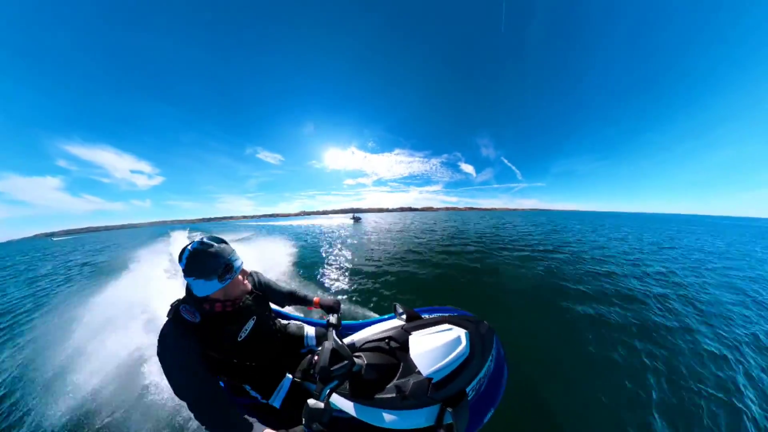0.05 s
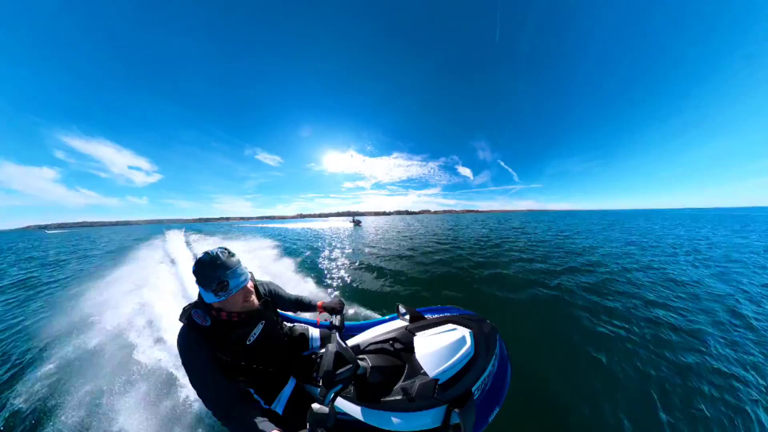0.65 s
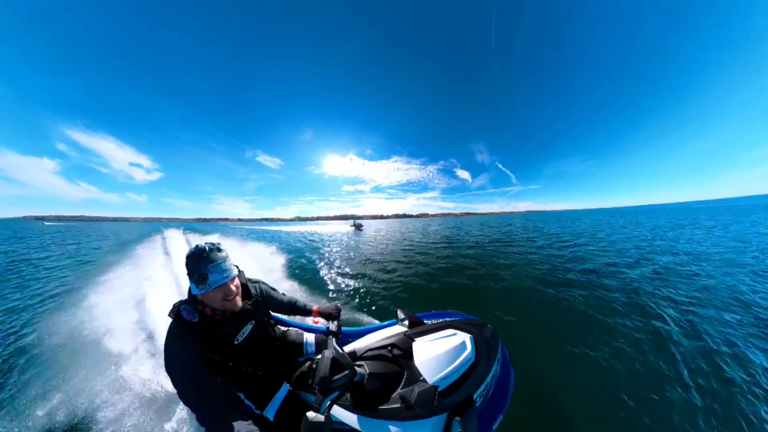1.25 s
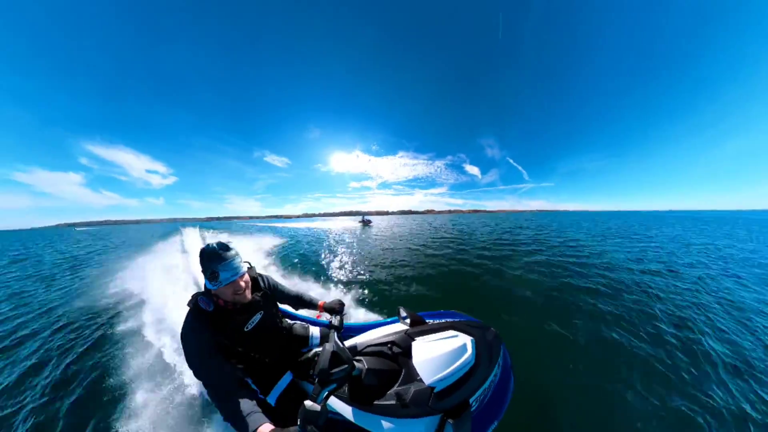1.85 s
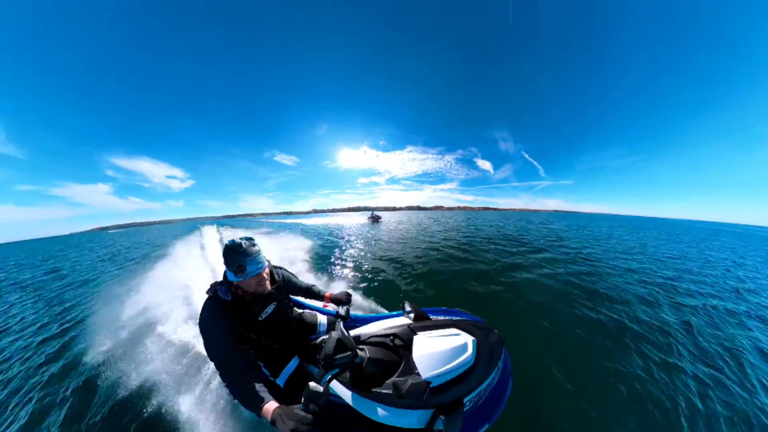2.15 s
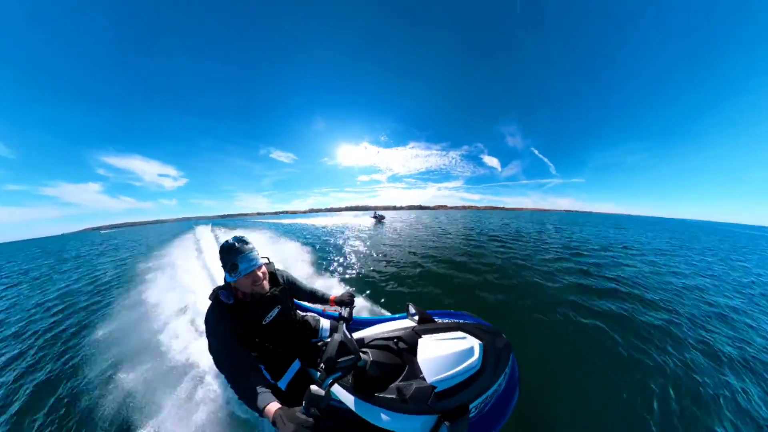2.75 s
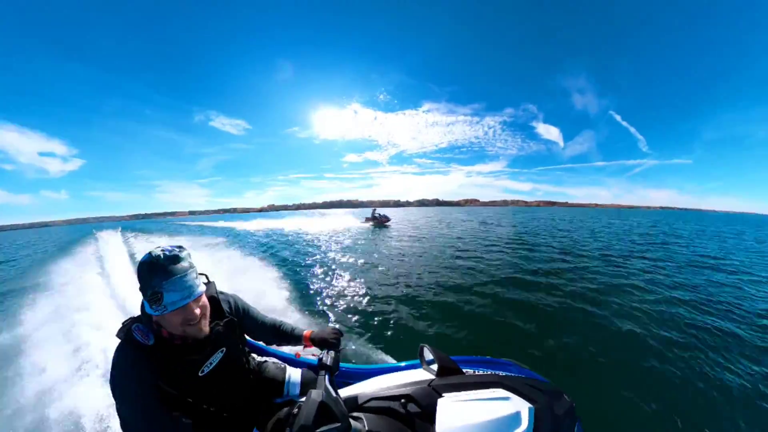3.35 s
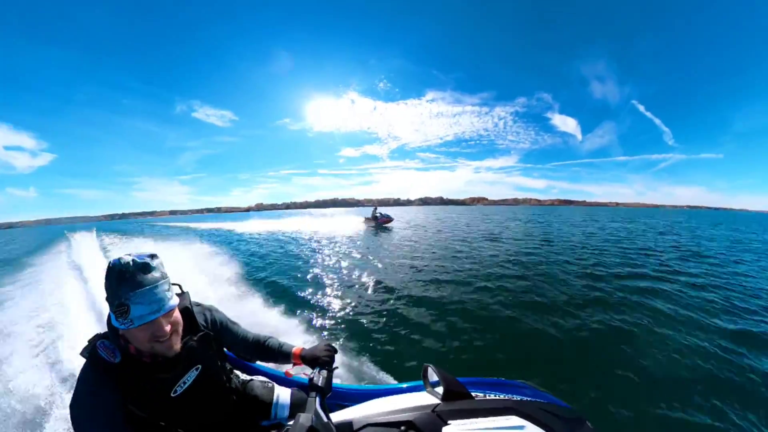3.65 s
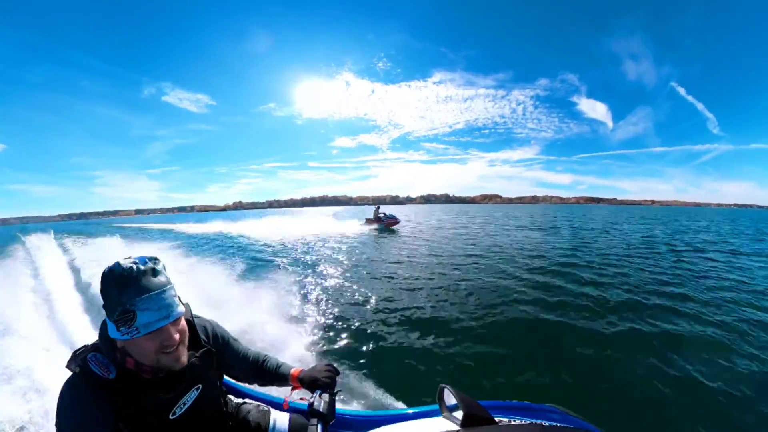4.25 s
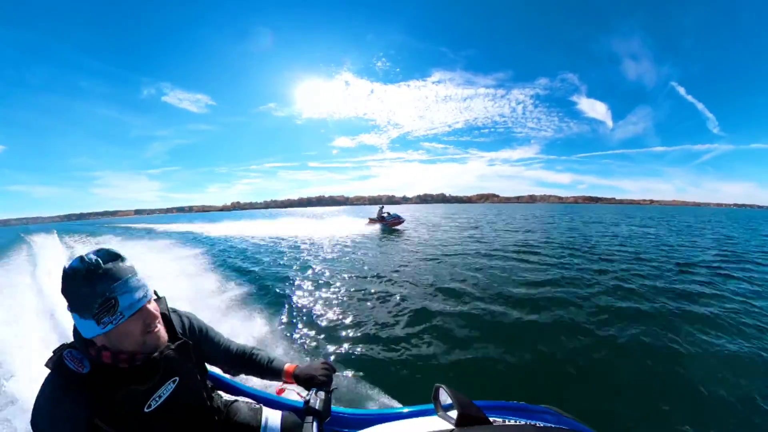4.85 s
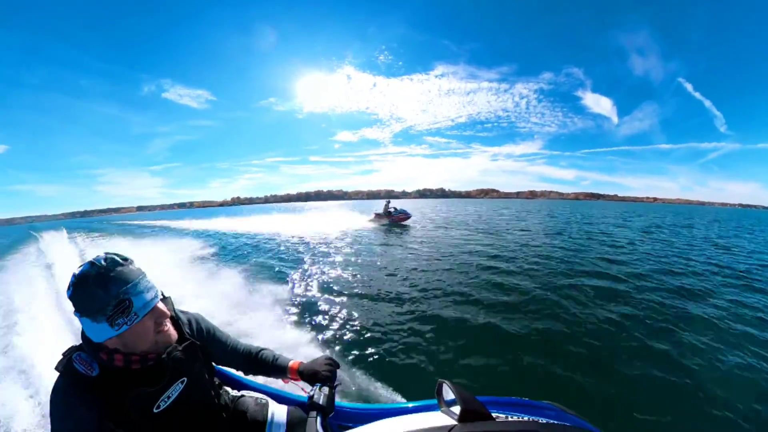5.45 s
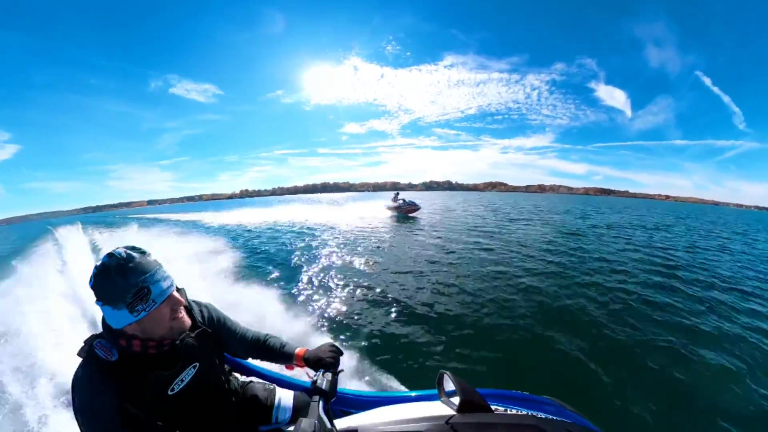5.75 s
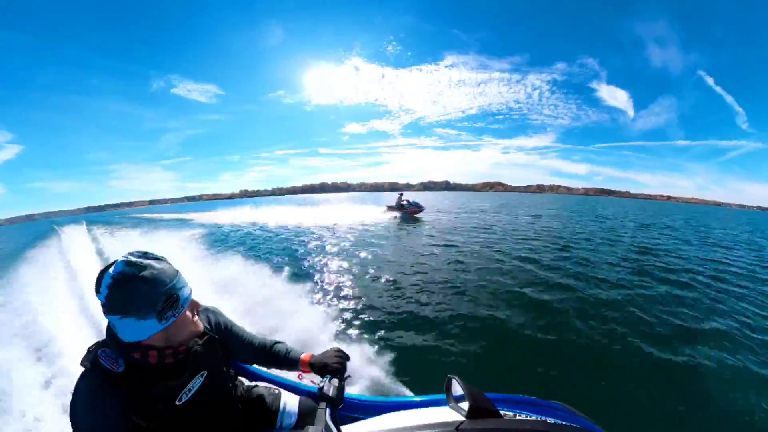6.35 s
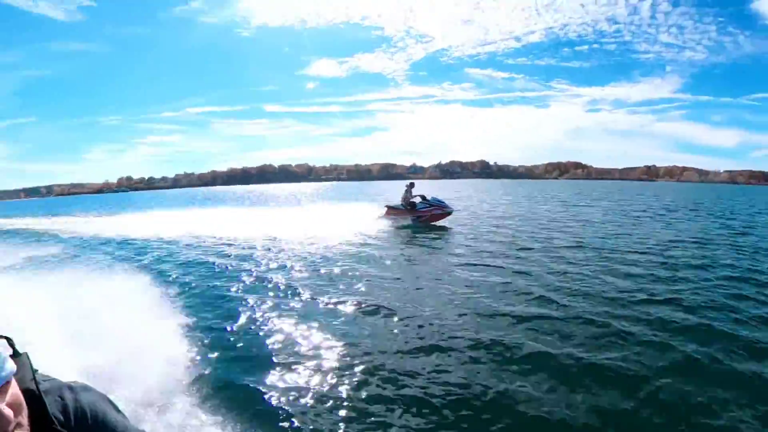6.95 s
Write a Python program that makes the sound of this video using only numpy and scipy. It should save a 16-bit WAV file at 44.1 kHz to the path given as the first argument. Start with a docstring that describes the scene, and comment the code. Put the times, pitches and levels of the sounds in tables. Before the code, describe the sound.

Low wind buffets the microphone as a personal watercraft speeds along, its engine humming evenly and water rushing along the hull.

```python
"""A personal watercraft runs at full, steady throttle over open water, heard from its rider's camera.
From the start, the four-stroke engine drones through low, thumping wind. Each wave swells the rush
of water along the hull and the thin hiss of spray. Now and then water slaps the hull or a drop ticks
on the camera. At about 5.7 s the hull lands flat with one dull knock. The strongest wind thump follows
at 6 s, then one more big wave near 6.9 s, while the engine drones on to the end."""
import sys
import numpy as np
from scipy import signal
from scipy.fft import rfft, irfft
from scipy.io import wavfile
from scipy.ndimage import uniform_filter1d

SR = 44100
rng = np.random.default_rng(int(sys.argv[2]) if len(sys.argv) > 2 else 0)


def output_pcm(signal):
    """Save a mono or channel-first signal as 16-bit PCM at the path in sys.argv[1].

    Samples are clipped to [-1, 1] before scaling.
    """
    pcm = np.clip(np.atleast_2d(signal).T, -1, 1) * 32767
    wavfile.write(sys.argv[1], SR, np.round(pcm).astype(np.int16))


N = 317961
TIME = np.arange(N) / SR
TOP_HZ = 9100  # the camera hears little above this pitch

# The larger waves that the bow meets. Columns: peak_s, swell_db
BOW_WAVES = [(0.26, 3.5), (0.52, 2.5), (0.96, 3.5), (1.25, 2.5), (1.44, 0.5), (1.66, 3), (2.06, 2.5),
             (2.5, 2.5), (2.75, 2.5), (3.15, 2), (3.72, 0.5), (4.61, 1.6), (5.05, 1), (5.23, 1),
             (5.77, -0.5), (5.9, 3.5), (6.22, 1.5), (6.55, 1.5), (6.89, 4)]
# How strong each pitch is in the hiss of spray. Columns: pitch_hz, relative_db
SPRAY_SPECTRUM = [(1000, -21.5), (3200, -1), (4000, -11.5), (4800, -21.5), (5500, -15), (6300, -4.5),
                  (7100, -1.5), (8000, -6.5), (8600, -15.5), (9200, -29.5)]
# The tick of the camera's shell when a drop hits it. Columns: pitch_hz, relative_db
TICK_SPECTRUM = [(1000, -26), (3000, -8), (4500, -20.5), (5500, -15.5), (6400, -2), (7400, 3), (8200, -6.5),
                 (9200, -20.5)]
# Drops on the camera. Columns: start_s, relative_peak_db, splash_share, brightness_db_per_octave
CAMERA_DROPS = [(0.1435, -48.5, .06, 3), (0.2688, -44, .06, 3), (1.668, -48, .18, -5), (1.676, -51, .08, 1),
                (1.9838, -54, .1, -10), (3.1256, -54, .1, -11), (3.1666, -38.5, .045, 3),
                (3.5221, -50, .06, 2), (3.7185, -46, .06, 0), (3.9275, -55, .05, -12),
                (4.2204, -43, .04, -4), (4.4679, -45.5, .06, 7), (5.1053, -44, .06, 2),
                (5.2765, -53, .15, -6.5), (5.642, -53, .4, -5), (5.7346, -52, .4, -2),
                (5.7419, -51, .1, -3), (5.779, -54, .3, -5), (5.7839, -50, .15, 2), (5.888, -48, .15, 2),
                (5.8963, -53, .2, -7.5), (6.5255, -46, .06, -2), (6.852, -51, .3, 0),
                (6.9103, -51, .25, -3), (6.9642, -44, .1, 3), (7.1496, -39.5, .04, 1)]
# Slaps of water on the hull. Columns: start_s, peak_db, pitch_hz, decay_s
HULL_SLAPS = [(0.144, -42, 2300, .004), (1.274, -42, 2000, .003), (1.417, -40, 2000, 0.0018),
              (1.667, -37.5, 1680, .005), (1.984, -37, 2170, 0.0012), (2.415, -41, 2210, 0.0038),
              (4.288, -37, 1600, 0.0023), (4.904, -35.5, 1730, 0.0023), (5.733, -35, 1300, 0.0058),
              (5.896, -39, 2100, 0.0027), (6.91, -40, 2020, 0.0044), (6.963, -42, 2500, .002),
              (7.15, -45.5, 2500, .001)]
# Water rushing along the hull. Columns: pitch_hz, relative_db
RUSH_SPECTRUM = [(200, -11.5), (420, 0.5), (520, 1), (590, -3.5), (700, -4.5), (820, -6.5), (920, -10),
                 (1040, -10), (1130, -14), (1260, -13), (1500, -20), (2000, -26), (2900, -34.5),
                 (6000, -84.5)]
# Wind beating on the microphone. Columns: pitch_hz, relative_db
WIND_SPECTRUM = [(8, -43.5), (20, -24), (30, -15), (40, -8), (58, -6), (82, 1.5), (102, -5), (135, -4),
                 (160, -8), (220, -6), (290, -11), (370, -11.5), (440, -25), (900, -50.5)]
# Gusts and lulls in the headwind. Columns: peak_s, rumble_change_db, flutter_change_db
WIND_GUSTS = [(0.09, -4, 1), (0.56, -6.5, 5.5), (0.86, -6, 0), (0.97, -2, 3), (1.62, -1, -1.5),
              (1.69, 0.5, 4), (2.17, 0.5, 2.5), (2.27, -0.5, -2), (2.62, -4.5, 3), (2.76, -0.5, 3),
              (3.17, 0.5, 1.5), (3.3, 0, 3.6), (3.41, -2, -4.5), (3.75, 1.5, 2), (5.25, -1.5, 1),
              (5.36, -5, -1), (6.15, -6, 0.5), (6.71, 0, 0), (6.96, -1, 1)]
# Large swirls of air that thump on the microphone. Columns: peak_s, peak_db, pitch_hz
WIND_THUMPS = [(0.424, -16.5, 76.7), (0.63, -19.5, 86), (0.783, -21.5, 82), (1.047, -19.5, 79),
               (1.884, -17.5, 80), (2.332, -21, 83.5), (2.895, -18, 88), (3.34, -23, 79.5), (3.62, -24, 70),
               (3.997, -18, 74), (4.298, -21, 85), (5.025, -25, 89), (5.121, -23, 78), (5.29, -19, 85),
               (5.999, -14.5, 68.6), (6.267, -17.5, 93), (6.31, -20.5, 74.4), (6.585, -21, 73.4),
               (6.775, -20, 82)]
# Engine speed, which sags a little when the pump bites harder. Columns: time_s, cycles_per_s
ENGINE_SPEED = [(0, 60.02), (0.55, 60.33), (0.9, 60.0), (1.3, 59.68), (2.1, 60.14), (3.0, 59.97),
                (3.85, 60.1), (4.3, 59.55), (4.7, 59.87), (5.6, 60.08), (7.21, 60.04)]
# The tones that make up the engine's drone. Columns: multiple_of_cycle_rate, base_level_db
ENGINE_TONES = [(2, -43), (4, -32), (6, -39), (7, -51), (8, -43.5), (10, -53), (11, -51.5), (14, -59.5),
                (16, -53.5), (17, -54.5), (18, -62.5), (19, -65), (20, -60.5), (21, -59.5), (22, -72),
                (28, -75.5), (39, -73.5), (41, -77), (48, -79)]
# The rise and fall of the exhaust note. Columns: time_s, relative_db
EXHAUST_SWELLS = [(0, -23.5), (0.11, -27), (0.24, -37), (0.47, -41), (0.61, -31.5), (1.22, -26),
                  (1.38, -33), (1.68, -33.5), (1.9, -37.5), (2.25, -35.5), (2.78, -29), (3.4, -34.5),
                  (3.85, -32.5), (4.35, -27), (4.72, -27), (5.03, -37.5), (5.23, -30.5), (5.95, -34),
                  (6.15, -31.5), (6.52, -30.5), (6.72, -40), (7.0, -30.5), (7.21, -29)]


def amp(db):
    """Turns decibels into a number to multiply a sound by."""
    return 10 ** (np.asarray(db) / 20)


def unit(x):
    """Scales x so that its average strength (rms) is 1."""
    return x / np.sqrt(np.mean(x ** 2) + 1e-20)


def curve(rows):
    """Joins (time_s, value) points with straight lines."""
    return np.interp(TIME, *np.transpose(rows))


def colour(x, spectrum):
    """Makes each pitch in x as strong as the spectrum says, and silences those beyond its ends."""
    hz, db = np.transpose(spectrum)
    all_hz = np.fft.rfftfreq(len(x), 1 / SR)
    shape_db = np.interp(np.log(all_hz + 1), np.log(hz), db, left=-120, right=-120)
    return irfft(rfft(x) * amp(shape_db), len(x))


def drift(rate_hz, points=8192):
    """A smooth random wobble of strength 1 that changes up to about rate_hz times a second."""
    hz = np.fft.rfftfreq(points, TIME[-1] / points)
    slow = irfft(rfft(rng.standard_normal(points)) / np.sqrt(1 + (hz / rate_hz) ** 4))
    return unit(np.interp(TIME, np.linspace(0, TIME[-1], points), slow))


def humps(rows, rise_s, fall_s):
    """A level in dB with one smooth hump or dip for each (peak_s, change_db) row."""
    return sum(db * np.exp(-.5 * ((TIME - peak_s) / np.where(TIME < peak_s, rise_s, fall_s)) ** 2)
               for peak_s, db in rows)


def add(mix, start_s, sound):
    """Mixes a sound in at start_s."""
    part = mix[round(start_s * SR):][:len(sound)]
    part += sound[:len(part)]


def wave_swell(chop_db=0.5, chop_hz=6.2):
    """How hard the hull works the water, in dB: the larger waves on top of a small random chop."""
    return humps(BOW_WAVES, rise_s=0.069, fall_s=0.056) + chop_db * drift(chop_hz)


def spray(swell_db, level_db=-67.0, follow=0.9, droplets_per_s=260, droplet_db=-7.0, spread_db=4.0):
    """Each wave throws up a fine, hissing mist with droplets of uneven size in it."""
    sizes = amp(spread_db * np.minimum(rng.exponential(1, N), 4)) * rng.choice([-1, 1], N)
    droplets = unit(sizes * (rng.random(N) < droplets_per_s / SR))
    mist = rng.standard_normal(N) * amp(1.15 * drift(rate_hz=40))
    hiss = unit(colour(mist + amp(droplet_db) * droplets, SPRAY_SPECTRUM))
    return hiss * amp(level_db + follow * swell_db)


def camera_drops(boost_db=1, splash_s=0.0028):
    """Each drop makes a sharp tick, then a tiny splash; some ticks sound bright, others dull."""
    out, t = np.zeros(N), np.arange(2048) / SR
    for start_s, peak_db, splash_share, brightness in CAMERA_DROPS:
        splash = splash_share * rng.standard_normal(len(t)) * np.exp(-t / splash_s)
        hit = np.roll((t == 0) + splash, len(t) // 2)  # centred, to give the filter room on both sides
        spectrum = [(hz, db + brightness * np.log2(hz / TOP_HZ)) for hz, db in TICK_SPECTRUM]
        tick = colour(hit, spectrum)
        add(out, start_s - t[-1] / 2, amp(peak_db + boost_db) * tick / abs(tick).max())
    return out


def hull_slaps(rise_s=0.0012, treble_limit_hz=3350):
    """Lumps of water strike the hull, each making a short, dull burst of noise."""
    out, t = np.zeros(N), np.arange(2048) / SR
    dull = signal.butter(4, treble_limit_hz, fs=SR, output="sos")
    for start_s, peak_db, pitch_hz, decay_s in HULL_SLAPS:
        band = signal.butter(3, [0.49 * pitch_hz, 1.19 * pitch_hz], "band", fs=SR, output="sos")
        burst = rng.standard_normal(len(t)) * np.minimum(t / rise_s, 1) * np.exp(-t / decay_s)
        slap = signal.sosfilt(np.vstack([band, dull]), burst)
        add(out, start_s - rise_s, amp(peak_db) * slap / abs(slap).max())
    return out


def hull_knock(peak_s=5.7421, peak_db=-18.5, pitch_hz=620):
    """The hull lands flat on a wave and sends out one dull pulse that does not ring."""
    offset_squared = (np.pi * pitch_hz * (TIME - peak_s)) ** 2
    return amp(peak_db) * (2 * offset_squared - 1) * np.exp(-offset_squared)


def hull_rush(swell_db, level_db=-36.0, follow=0.9, churn_db=0.8):
    """Water churns along the hull and gets louder each time the bow meets a wave."""
    churn = rng.standard_normal(N) * amp(churn_db * drift(rate_hz=51))
    return unit(colour(churn, RUSH_SPECTRUM)) * amp(level_db + follow * swell_db)


def wind(rumble_db=-25.0, flutter_db=-26.0, split_hz=132.8, buffet_db=0.76, buffet_hz=6.1):
    """Swirls of air hit the microphone: big ones rumble, small ones flutter, and both follow the gusts."""
    out = np.zeros(N)
    for column, side, level_db in [(1, "low", rumble_db), (2, "high", flutter_db)]:
        band = signal.butter(6, split_hz, side, fs=SR, output="sos")
        swirls = signal.sosfilt(band, colour(rng.standard_normal(N), WIND_SPECTRUM))
        swirls /= np.sqrt(uniform_filter1d(swirls ** 2, 3600) + 1e-20)  # even out chance swells
        gust_db = humps([(row[0], row[column]) for row in WIND_GUSTS], rise_s=0.035, fall_s=0.029)
        out += swirls * amp(level_db + gust_db + buffet_db * drift(buffet_hz))
    return out


def wind_thumps(width_s=0.016):
    """Each large swirl rocks the air pressure back and forth a few times as it passes."""
    out = np.zeros(N)
    for peak_s, peak_db, pitch_hz in WIND_THUMPS:
        t = TIME - peak_s
        loudness = amp(peak_db) * np.exp(-.5 * (t / width_s) ** 2)
        out += loudness * np.cos(2 * np.pi * (pitch_hz * t + rng.random()))
    return out


def engine(wander_hz=0.061, exhaust_boost_db=0.46, follow=0.9, flutter_db=0.5,
           other_tones_db=-0.65, waver_db=1.4, scatter=0.018, roughness=0.1):
    """Tones locked to the engine's speed; swirling air and spray scatter them, the high ones most."""
    speed_hz = curve(ENGINE_SPEED) + wander_hz * drift(rate_hz=4.18)  # the pump's load keeps changing
    cycles = np.cumsum(speed_hz) / SR
    exhaust_db = curve(EXHAUST_SWELLS)
    swell_db = follow * (exhaust_db - exhaust_db.mean())
    out = np.zeros(N)
    for multiple, base_db in ENGINE_TONES:
        if multiple == 4:  # the exhaust note: the engine fires four times a cycle
            level_db = base_db + exhaust_boost_db + swell_db + flutter_db * drift(rate_hz=5.9)
        else:
            level_db = base_db + other_tones_db + waver_db * drift(rate_hz=4.0)
        # Multiplying by a complex wobble shifts both the tone's strength and its timing.
        wobble = 1 + scatter * multiple * (drift(rate_hz=3.0) + 1j * drift(rate_hz=3.0))
        pure_tone = np.exp(2j * np.pi * (multiple * cycles + rng.random()))
        tone = unit((wobble * pure_tone).real)
        out += amp(level_db) * (1 + roughness * drift(rate_hz=30)) * tone
    return out


def scene():
    """Mixes engine, wind and water into one channel; the same waves drive both rush and spray."""
    swell_db = wave_swell()
    water = spray(swell_db) + camera_drops() + hull_slaps() + hull_knock() + hull_rush(swell_db)
    air = wind() + wind_thumps()
    return (water + air + engine())[None]


def record(dry):
    """The camera sharply cuts off the highest treble."""
    treble_cut = signal.firwin(511, TOP_HZ, window=("kaiser", 9), fs=SR)
    return signal.oaconvolve(dry, treble_cut[None], "same")


dry = scene()
out = record(dry)
output_pcm(out)
```